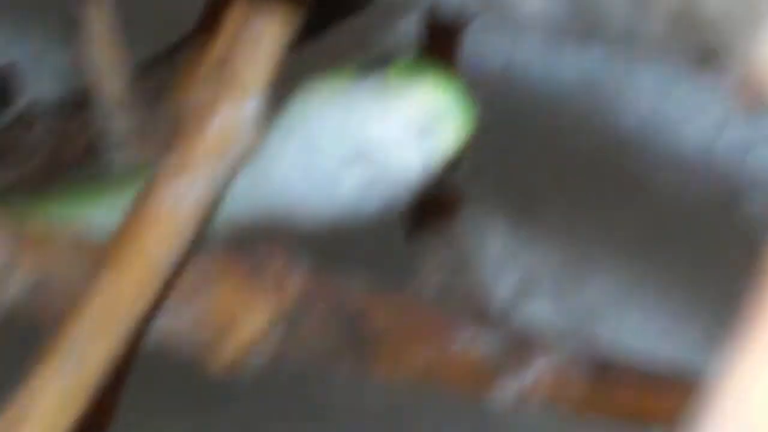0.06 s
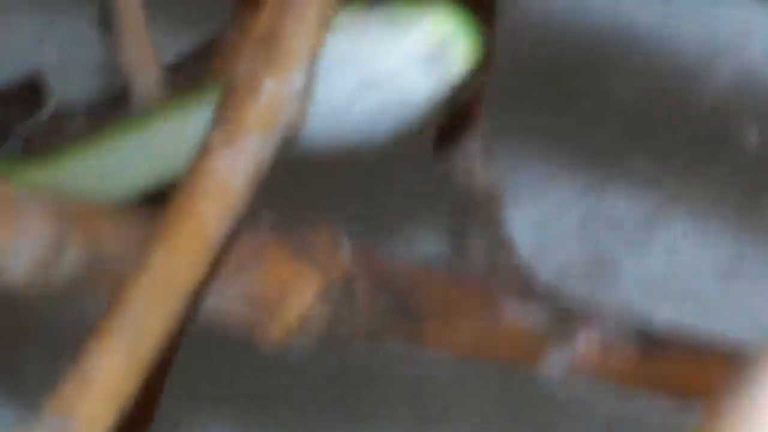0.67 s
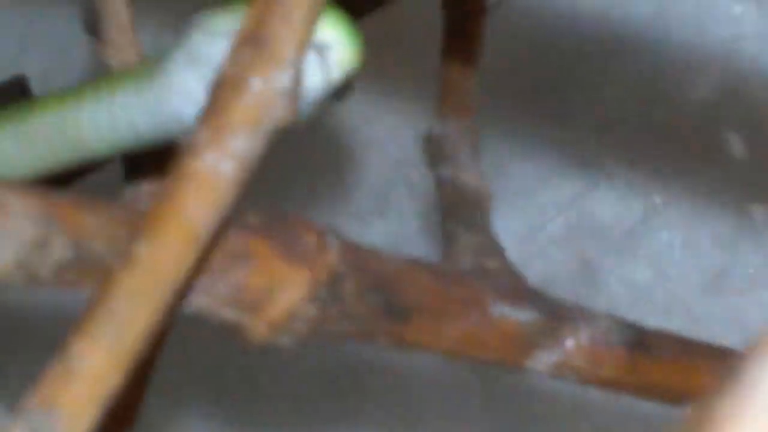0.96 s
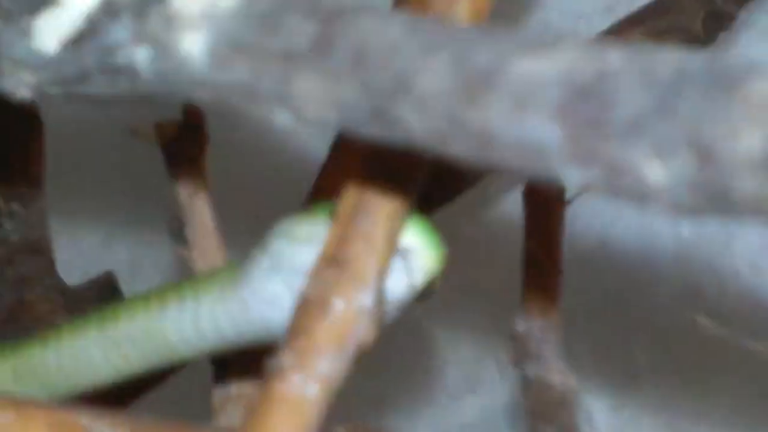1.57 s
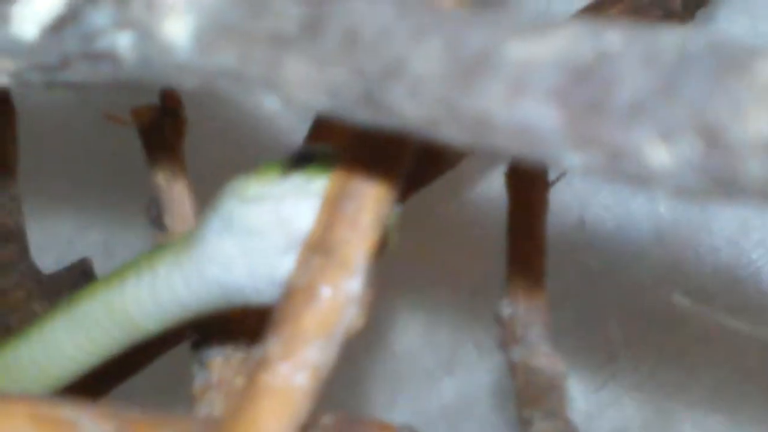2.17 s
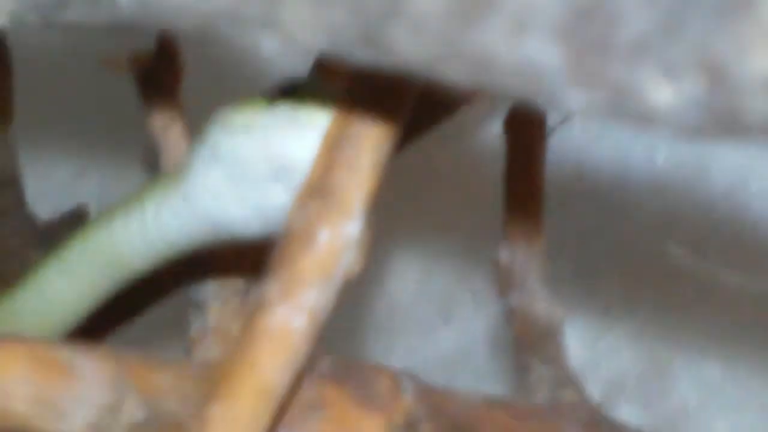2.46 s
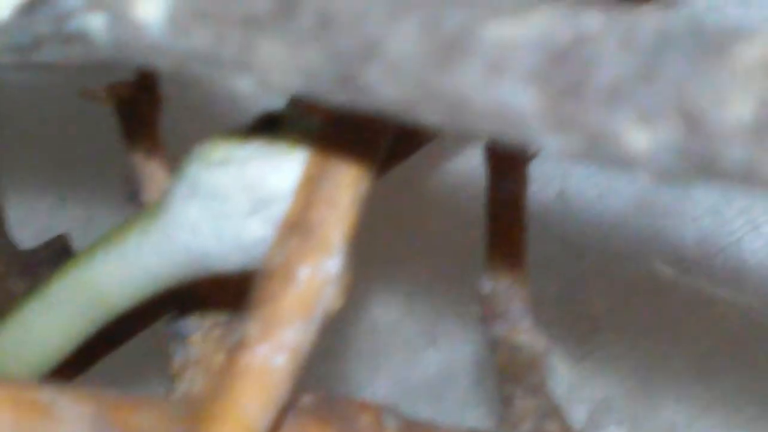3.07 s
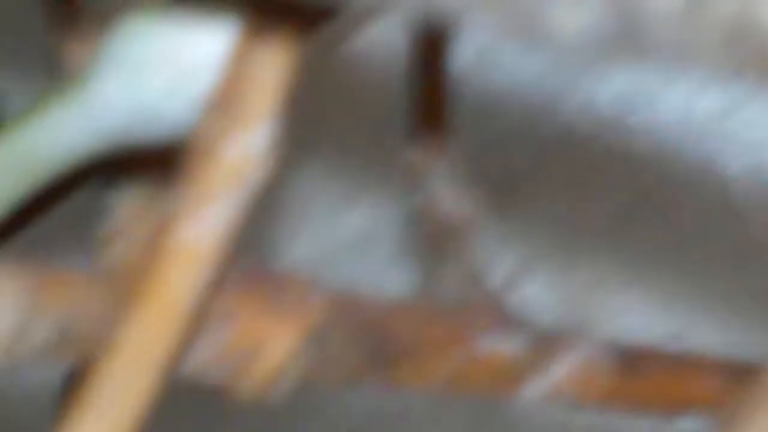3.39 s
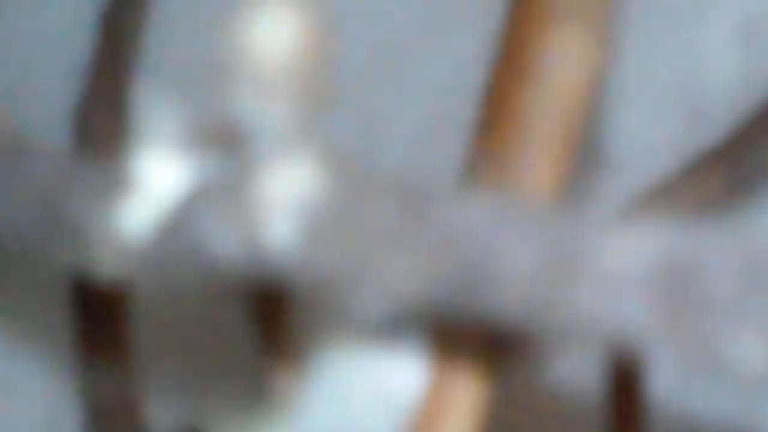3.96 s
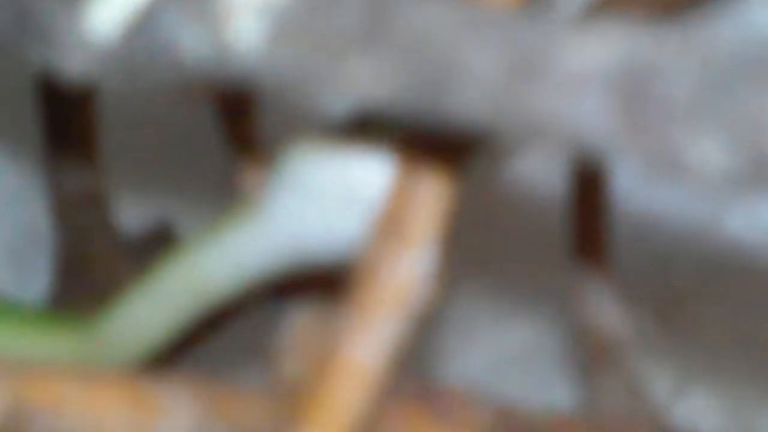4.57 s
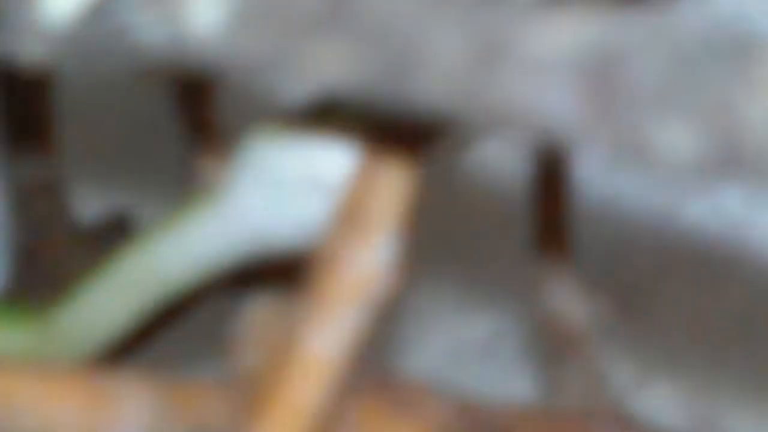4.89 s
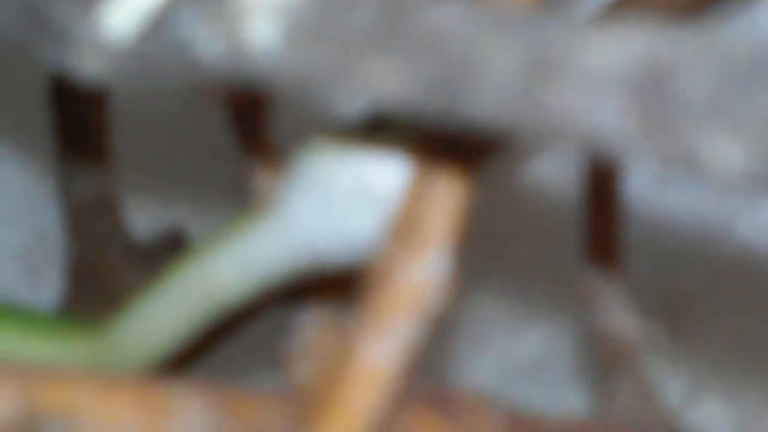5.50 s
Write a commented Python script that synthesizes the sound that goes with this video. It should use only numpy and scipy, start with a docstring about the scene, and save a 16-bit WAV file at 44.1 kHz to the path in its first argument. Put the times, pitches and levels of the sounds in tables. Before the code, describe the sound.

Fingers rub and click on a small camera as it knocks hollowly into sticks and scrapes along the wood.

```python
"""In an animal enclosure in a quiet room, a small camera is pushed in among the sticks.
Fingers slide and crunch on its casing; the casing clicks, bumps into wood and scrapes along it.
Rubbing is a stream of tiny slips, heard as hiss, rasp and rumble. A bump makes the camera and
the stick ring. The camera's body carries all this straight to the microphone, and the room
answers with a faint echo."""
import sys
import numpy as np
from scipy import signal
from scipy.fft import rfft, irfft
from scipy.io import wavfile

SR = 44100
rng = np.random.default_rng(int(sys.argv[2]) if len(sys.argv) > 2 else 0)


def log_audio(samples):
    """Write samples as a 16-bit WAV file to the path given in sys.argv[1]."""
    # one column per channel
    frames = np.atleast_2d(samples).T
    # limit to full scale, then quantise
    limited = np.clip(frames, -1, 1)
    pcm = np.round(limited * 32767).astype(np.int16)
    wavfile.write(sys.argv[1], SR, pcm)


N = 253134


def from_db(db):
    """Turn decibels into a volume factor."""
    return 10 ** (np.asarray(db) / 20)


def rms_one(x):
    """Scale a sound to an average strength (rms) of one."""
    return x / np.sqrt(np.mean(x ** 2) + 1e-20)


def at_hz(points, hz):
    """Read between a table's rows, with octaves evenly spaced."""
    row_hz, value = np.transpose(points)
    return np.interp(np.log(np.maximum(hz, 1)), np.log(row_hz), value)


def colour(x, tone):
    """Turn each frequency up or down as a table says."""
    gain = from_db(at_hz(tone, np.fft.rfftfreq(len(x), 1 / SR)))
    return irfft(rfft(x) * gain, len(x))


def band(x, hz, kind, order=2):
    """Keep the lows, the highs or a band between."""
    return signal.sosfilt(signal.butter(order, hz, kind, fs=SR, output="sos"), x)


def resonance(x, hz, width_hz):
    """Let a sound ring around one frequency."""
    r = np.exp(-np.pi * width_hz / SR)
    feedback = [1, -2 * r * np.cos(2 * np.pi * hz / SR), r * r]
    return signal.lfilter(np.array([1, 0, -1]) * (1 - r * r) / 2, feedback, x)


def add(out, start, sound):
    """Mix a sound in at a time in seconds."""
    at = round(start * SR)
    out[at:at + len(sound)] += sound[:N - at]


def seconds(length):
    """The time of each sample of a short sound."""
    return np.arange(int(length * SR)) / SR


def ease(x):
    """Rise smoothly from 0 to 1."""
    return np.sin(np.pi / 2 * np.clip(x, 0, 1)) ** 2


# tone of the steady noise: (frequency [Hz], relative level [dB])
AIR_TONE = [(25, -15.5), (45, -3), (60, 3), (85, -16.5), (105, -12), (130, -7), (200, -17.5), (320, -16.5),
            (840, -15.5), (1260, -19), (3000, -23), (7700, -26), (14800, -20.5), (16000, -22.5)]
# electrical hum: (frequency [Hz], level [dB])
HUM_NOTES = [(58, -83.5), (120, -87)]
def background(air_db=-73):
    """Still air, microphone hiss and a trace of mains hum."""
    t = np.arange(N) / SR
    hum = sum(np.sqrt(2) * from_db(db) * np.sin(2 * np.pi * hz * t) for hz, db in HUM_NOTES)
    return from_db(air_db) * rms_one(colour(rng.standard_normal(N), AIR_TONE)) + hum


def tiny_slips(grain_db, catch_hz):
    """Noise whose strength jumps as two surfaces catch and let go."""
    catching = rms_one(band(rng.standard_normal(N), catch_hz, "low"))
    return rng.standard_normal(N) * from_db(grain_db * np.clip(catching, -2, 2))


def stroke_speed(t, length, swell, fade, steepness=2.37):
    """A stroke gathers speed, runs and dies away."""
    outside = np.maximum(1 - t / swell, 0) + np.maximum(1 - (length - t) / fade, 0)
    return 1 / np.cosh(np.minimum(steepness * outside, 20))


# notes of the camera's body, rubbed or bumped: (frequency [Hz], relative level [dB], free ring time [s])
BODY_NOTES = [(75.4, -16, .36), (140, -16, .12), (155, -10, .20), (225, -10, .15), (298, -12, .11),
              (411, 0, .11), (436, -12, .11), (526, -13, .10), (608, -20, .07), (701, -9, .09),
              (825, -13, .09), (1004, -22, .07), (1230, -29, .06), (1395, -30, .05)]
def body_rumble(force, width_hz):
    """Rubbing shakes the body's notes, and the contact blurs their pitch."""
    return sum(from_db(db) * (-1) ** k * resonance(force, hz, width_hz)
               for k, (hz, db, _) in enumerate(BODY_NOTES))


FIRM_DB = -42.5   # level of a firm stroke
def rubbing(strokes, tone, peaks, grain_db, catch_hz, width_hz, soft_hz, flex_db,
            swell_share, fade_share, rasp_db, rumble_db, air_db, hiss_hz=7500):
    """Slips make hiss, rasp and rumble in the camera and a rustle in the air; gives (close, airborne)."""
    slips = tiny_slips(grain_db, catch_hz)
    surface = colour(slips, tone)
    surface = surface + sum(from_db(db) * resonance(surface, hz, width) for hz, width, db in peaks)
    hiss = rms_one(band(surface, hiss_hz, "high", order=4))
    rasp = rms_one(band(surface, [550, hiss_hz], "band", order=3))
    flex = rms_one(band(slips, [50, 170], "band"))   # the casing gives under the fingers
    body = rms_one(band(body_rumble(slips, width_hz), soft_hz, "low"))   # a soft touch stirs low notes
    rumble = rms_one(body + from_db(flex_db) * flex)
    casing = from_db(rasp_db) * rasp + from_db(rumble_db) * rumble
    effort, shaking = np.zeros((2, N))
    for start, length, level_db in strokes:
        swell, fade = swell_share * length, fade_share * length
        span = np.arange(round((start - swell) * SR), round((start + length + 2 * fade) * SR))
        stroke = from_db(level_db) * stroke_speed(span / SR - start, length, swell, fade)
        effort[span] += stroke
        # a lighter stroke keeps more rasp and rumble for its hiss
        shaking[span] += stroke * from_db(0.1198 * (FIRM_DB - level_db))
    close = effort * hiss + shaking * casing
    airborne = from_db(air_db) * shaking * rustle(slips)
    return np.array([close, airborne])


# skin sliding on the casing: (time [s], length [s], level [dB])
SLIDE_STROKES = [(.168, 0.084, -49.5), (.238, 0.039, -38.5), (.400, 0.079, -43), (1.655, 0.062, -68),
                 (2.455, 0.11, -57), (2.545, 0.11, -67.5), (2.803, 0.11, -59)]
# its tone: (frequency [Hz], relative level [dB])
SKIN_TONE = [(400, -5), (1000, -17), (2000, -15), (3800, -16.5), (4700, -18.5), (5600, -16.5), (7200, -18),
             (8500, -11.5), (9800, -8.5), (11000, -8), (13000, -1.5), (15000, -1), (16000, -5)]
# ringing it adds in the casing: (frequency [Hz], width [Hz], relative level [dB])
SKIN_RINGS = [(1180, 79.8, 16), (1520, 38, 17.5), (2950, 200, 4.5), (4424, 240, 5), (8450, 990, 1)]
def finger_slides():
    """Skin slips over the casing with a fine hiss."""
    return rubbing(SLIDE_STROKES, SKIN_TONE, SKIN_RINGS, grain_db=-1.5, catch_hz=401.7,
                   width_hz=7.3, soft_hz=298.8, flex_db=-2.5, swell_share=.2, fade_share=.4,
                   rasp_db=-17, rumble_db=-13, air_db=-3.5)


# tone of rubbing in the air: (frequency [Hz], relative level [dB])
RUSTLE_TONE = [(240, -34), (400, -3.5), (839, -2), (921, -6.5), (994, -7), (3310, -12.5), (6740, -15),
               (14100, -3), (16000, -8)]
def rustle(slips):
    """The ringing stays in the casing; the air carries off one broad rustle."""
    return rms_one(colour(slips, RUSTLE_TONE))


# the room's echo: (frequency [Hz], time to fade by 60 dB [s])
ECHO_TIMES = [(100, .40), (500, 0.64), (2000, 0.76), (6000, .55), (15000, 0.65)]
def room_echo(x, build_s=0.0087, echo_db=-15):
    """A faint wash of reflections dies at its own pace in each octave."""
    t, echo = seconds(0.89), 0
    for hz in 60 * 2. ** np.arange(9):
        decay = ease(t / build_s) * 1000 ** (-t / at_hz(ECHO_TIMES, hz))
        octave = [hz / np.sqrt(2), min(hz * np.sqrt(2), SR / 2 - 1000)]
        noise = band(rng.standard_normal(len(t)), octave, "band")
        echo = echo + noise * decay / np.sqrt(np.sum(decay ** 2))
    return from_db(echo_db) * signal.fftconvolve(x, echo)[:N]


# sharp catches of the casing: (time [s], snap level [dB], thud level [dB])
CLICKS = [(0.2007, -29, -35.5), (.2778, -17.5, -32), (.285, -15.5, -17), (0.308, -2.5, -20.5),
          (1.017, -7, -40.5), (3.2044, -35.5, -47), (3.9866, -44, -41)]
def casing_clicks(snap_s=0.00026, ping_hz=14300, grit_db=-12, grit_s=0.0018, thud_s=0.00029):
    """A catch lets go: the microphone's opening pings, grit flies and the casing gets a short push."""
    out, t = np.zeros(N), seconds(.03)
    push = band(np.exp(-t / thud_s), 70, "high")
    thud = band(push, 1000, "low", order=3)
    ping = np.sin(2 * np.pi * ping_hz * t) * t / snap_s * np.exp(1 - t / snap_s)
    bump_clicks = [(start, db - 21, db - 6.5) for start, db, *_ in BUMPS]   # each bump clicks too
    for start, snap_db, thud_db in CLICKS + bump_clicks:
        grit = colour(rng.standard_normal(len(t)), GRIP_TONE) * np.exp(-t / grit_s)
        snap = ping + from_db(grit_db) * grit / np.abs(grit).max()
        add(out, start, from_db(snap_db) * snap + from_db(thud_db) * thud / np.abs(thud).max())
    return out


# the grip shifting: (time [s], length [s], level [dB])
CRUNCH_STROKES = [(.274, 0.013, -19.5), (.289, 0.02, -25.5), (.493, .016, -30.5), (1.020, 0.028, -27.5)]
# its tone: (frequency [Hz], relative level [dB])
GRIP_TONE = [(400, -19), (800, -18.5), (1500, -12.5), (2200, -20), (3200, -14.5), (4300, -16), (5200, -11),
             (7500, -16.5), (9200, -8.5), (10800, -11), (12200, -5.5), (14500, 1), (16000, -15.5)]
# ringing it adds in the casing: (frequency [Hz], width [Hz], relative level [dB])
GRIP_RINGS = [(1470, 120, 0.017), (2400, 370, 0.012), (3990, 250, 0.66)]
def grip_crunches():
    """Fingers shift under pressure in short, grainy bursts."""
    return rubbing(CRUNCH_STROKES, GRIP_TONE, GRIP_RINGS, grain_db=5, catch_hz=696,
                   width_hz=50, soft_hz=805, flex_db=6, swell_share=.2, fade_share=.25,
                   rasp_db=-10.5, rumble_db=-11.5, air_db=2)


# light taps on a stick: (time [s], level [dB])
STICK_TAPS = [(0.3987, -46), (0.4977, -40), (0.503, -40)]
# the stick's notes: (frequency [Hz], relative level [dB], ring time [s])
STICK_NOTES = [(400.6, -5, 0.15), (824, -2, 0.1), (1130, -5, 0.069), (1394, 0.5, .07), (1444, -4.5, .05),
               (2130, -6, .04), (2746, -2, 0.048), (3510, -10.5, 0.029), (4780, -11, .025)]
def stick_taps():
    """A hard edge touches a stick, and the wood rings briefly."""
    out, t = np.zeros(N), seconds(.2)
    bump_taps = [(start, db - 29) for start, db, *_ in BUMPS]   # each bump taps too
    for start, level_db in STICK_TAPS + bump_taps:
        for (hz, db, ring_s), sign in zip(STICK_NOTES, rng.choice([-1, 1], len(STICK_NOTES))):
            note = np.sin(2 * np.pi * hz * t) * 1000 ** (-t / ring_s)
            add(out, start, sign * from_db(level_db + db) * note)
    return out


# bumps on the sticks; where one lands sets its boom and hollow ring:
# (time [s], level [dB], boom boost [dB], hollow ring boost [dB])
BUMPS = [(0.399, -39.5, 22.5, -2), (.496, -47.5, 21.5, -4.5), (0.7023, -15, 0.5, -1.5),
         (0.8638, -13, 0, -1.5), (.995, -21, 2.5, 4.5), (1.243, -52.5, 7, -2.5), (2.555, -59, 0, 1.5),
         (3.207, -53, 25, 10), (3.2635, -27, -13, 3.5), (3.3474, -22.5, -10, -17), (3.407, -42.5, 10, 2),
         (3.533, -53, 8, 1), (4.021, -58.5, 23, 18)]
def camera_bumps(swell_s=0.0064, choke_s=.020, choke_db=-22, boom_hz=100, shell_hz=260,
                 scatter_db=1.5, grip_damping=1.01):
    """A bump holds the body's notes up for a moment; the grip chokes the high ones, the low ring on."""
    out, t = np.zeros(N), seconds(0.9)
    for start, level_db, boom_db, hollow_db in BUMPS:
        hold_s = 0.022 * 2 ** (min(boom_db, 0) / 20.5)   # a glancing bump, with little boom, ends sooner
        choke = from_db(choke_db * np.clip((t - hold_s) / choke_s, 0, 1))
        bright_hz = 880 * 2 ** ((level_db + 15.5) / 34.5)   # a stronger bump reaches higher notes
        chance = rng.standard_normal((len(BODY_NOTES), 2))
        for (hz, db, ring_s), (size, phase) in zip(BODY_NOTES, chance):
            place_db = boom_db if hz < boom_hz else hollow_db if hz < shell_hz else 0
            strength = from_db(level_db + db + place_db + scatter_db * size)
            strength /= np.hypot(1, (hz / bright_hz) ** 2)
            swell = swell_s / (1 + (hz / 560) ** 4)   # high notes answer at once
            decay = 1000 ** (-grip_damping * np.maximum(t - hold_s, 0) / ring_s)
            note = ease(t / swell) * decay * np.sin(2 * np.pi * hz * t + 0.37 * phase)
            add(out, start, strength * note * (choke if hz > shell_hz else 1))
    return out


# the casing dragging on a stick: (time [s], length [s], level [dB])
DRAG_STROKES = [(.708, .130, -29)]
# its tone: (frequency [Hz], relative level [dB])
DRAG_TONE = [(400, -14.5), (1000, -16.5), (2000, -24.5), (4000, -24), (6500, -24.5), (8000, -16),
             (10000, -11), (12400, 0.5), (14200, 1.5), (16000, -1.5)]
# ringing it adds in the casing: (frequency [Hz], width [Hz], relative level [dB])
DRAG_RINGS = [(834, 40, 5.6), (1080, 69, 4.6), (1420, 60, 5), (2766, 300, 4), (3676, 200, 6),
              (4394, 270, 18)]
def stick_drag():
    """Pressed on a stick and pushed along it, the casing rumbles and hisses."""
    return rubbing(DRAG_STROKES, DRAG_TONE, DRAG_RINGS, grain_db=2, catch_hz=704,
                   width_hz=27, soft_hz=260.8, flex_db=-18, swell_share=.38, fade_share=.44,
                   rasp_db=-13.5, rumble_db=1, air_db=6.5)


# the casing scraping a stick: (time [s], length [s], level [dB])
SCRAPE_STROKES = [(1.23, 0.052, -42), (1.465, 0.052, -48.5), (1.512, 0.072, -58.5), (3.202, 0.052, -48),
                  (3.274, 0.057, -36), (3.32, .047, -19.5), (3.372, 0.037, -39.5), (3.987, 0.055, -38),
                  (4.06, 0.074, -37), (4.588, 0.041, -68), (4.884, 0.024, -57.5)]
# its tone: (frequency [Hz], relative level [dB])
WOOD_TONE = [(400, -8), (800, -10), (1200, -10), (1800, -6), (2700, -15), (3600, -19), (4400, -9),
             (6100, -9), (6900, -20), (9000, -21), (11000, -16), (13700, 0), (14800, -3), (16000, -1)]
# ringing it adds in the casing: (frequency [Hz], width [Hz], relative level [dB])
WOOD_RINGS = [(1162, 110, 7.5), (1840, 110, -4), (2160, 600, 2), (4430, 150, -4), (5760, 100, -29)]
def wood_scrapes():
    """The casing catches and slips along wood in short, rough strokes."""
    return rubbing(SCRAPE_STROKES, WOOD_TONE, WOOD_RINGS, grain_db=3, catch_hz=690,
                   width_hz=170, soft_hz=900, flex_db=-4, swell_share=.23, fade_share=.37,
                   rasp_db=-13.5, rumble_db=-14, air_db=-2.5)


def scrape_bite(ring_hz=1750, width_hz=420, bite_db=-26, growth=0.51):
    """Pressed hard, a scrape bites into the wood: one ring of the casing grows faster than the hiss."""
    slips = tiny_slips(grain_db=3, catch_hz=600)
    ring = resonance(slips, ring_hz, width_hz)
    ring = rms_one(resonance(ring, ring_hz, 2 * width_hz))
    pressure = np.zeros(N)
    for start, length, level_db in SCRAPE_STROKES:
        speed = stroke_speed(seconds(2 * length), length, swell=0.37 * length, fade=0.75 * length)
        add(pressure, start, from_db(level_db + growth * (level_db - FIRM_DB)) * speed)
    return from_db(bite_db) * pressure * ring


def scene(blows_air_db=-8):
    """All the handling, its echo and the quiet room, in one channel."""
    close, airborne = finger_slides() + grip_crunches() + stick_drag() + wood_scrapes()
    blows = camera_bumps() + stick_taps()
    clicks = casing_clicks()
    echo = room_echo(airborne + from_db(blows_air_db) * blows)
    return (close + clicks + blows + echo + scrape_bite() + background())[None]


def record(dry, cutoff_hz=16000):
    """The highest treble is cut off steeply."""
    return signal.sosfilt(signal.ellip(12, .1, 80, cutoff_hz, fs=SR, output="sos"), dry)


dry = scene()
out = record(dry)
log_audio(out)
```